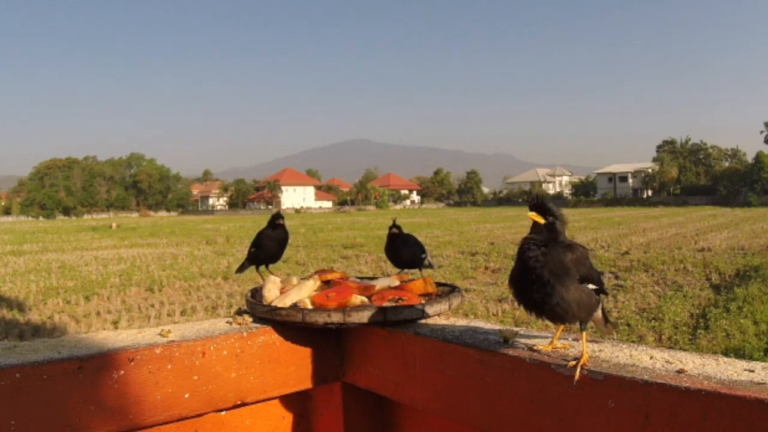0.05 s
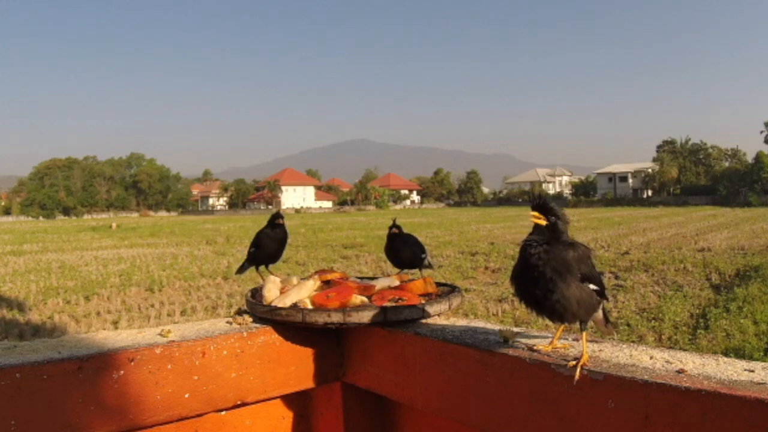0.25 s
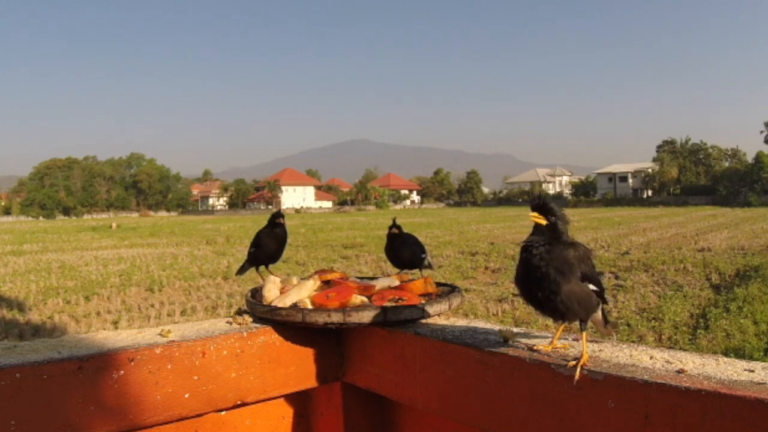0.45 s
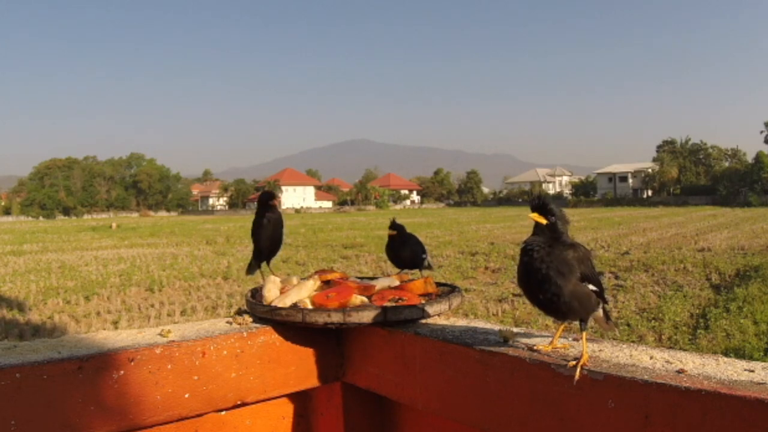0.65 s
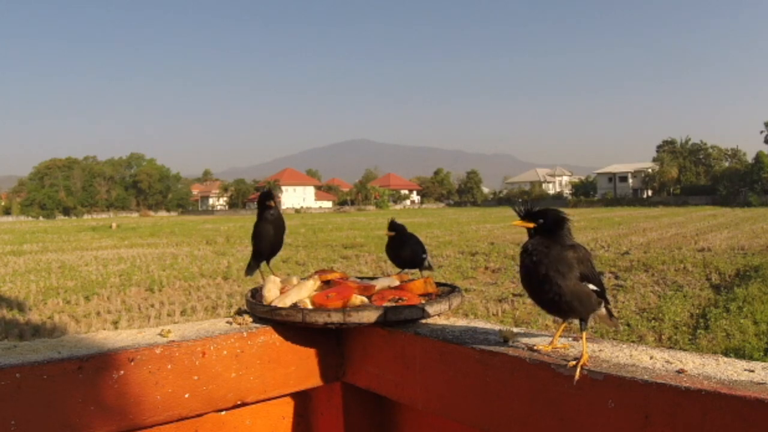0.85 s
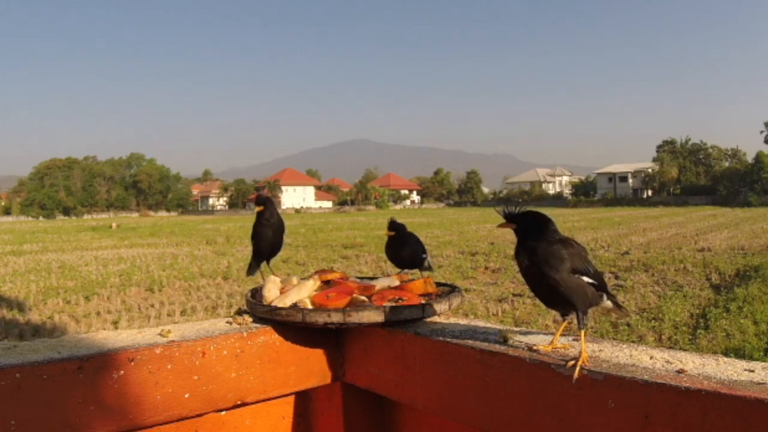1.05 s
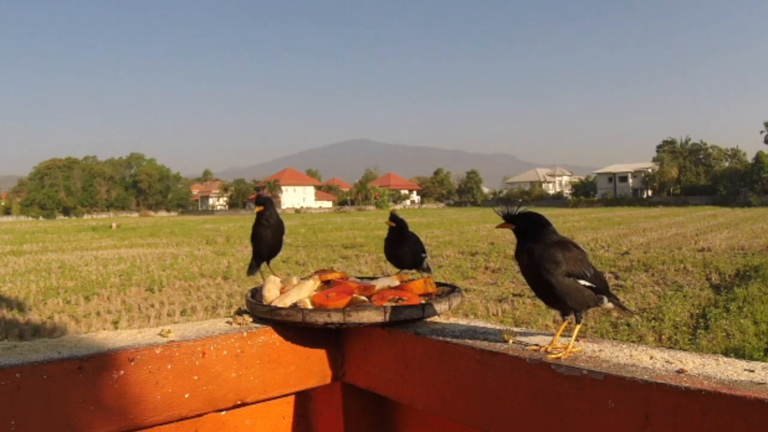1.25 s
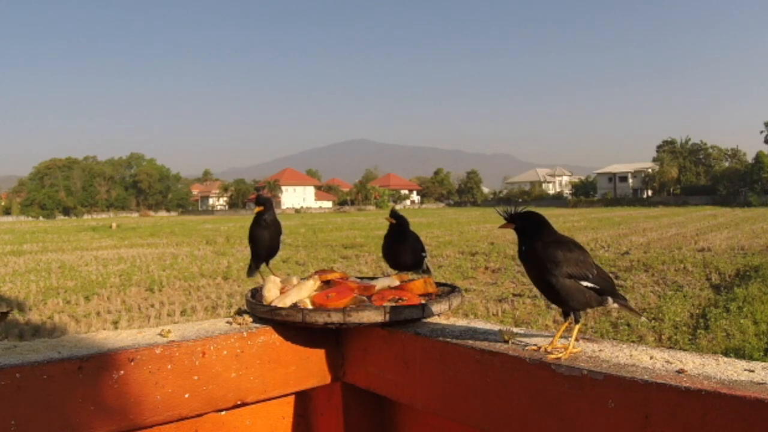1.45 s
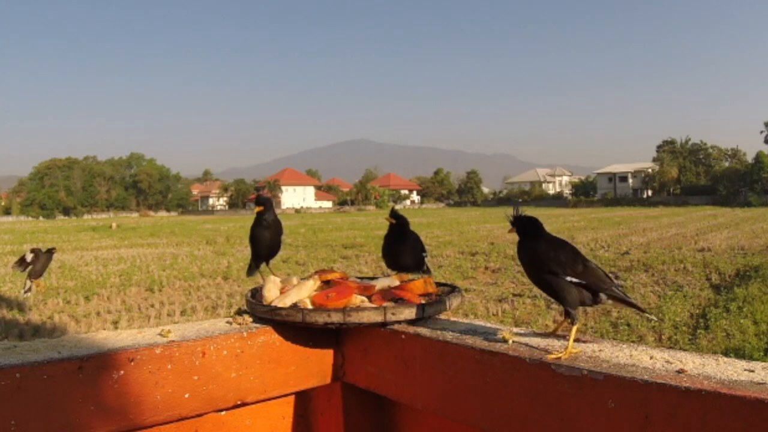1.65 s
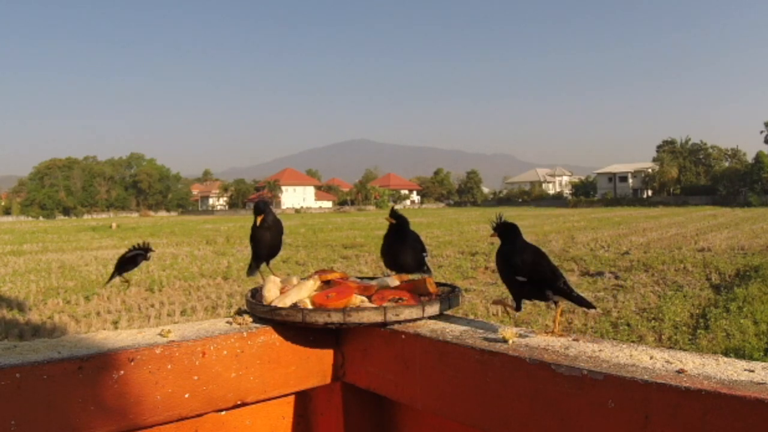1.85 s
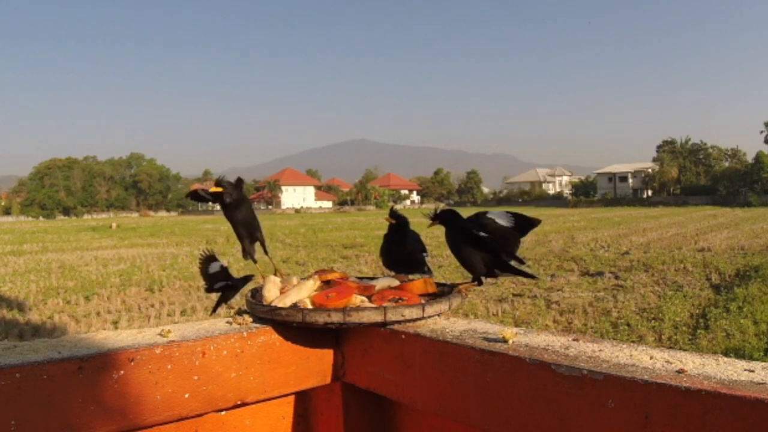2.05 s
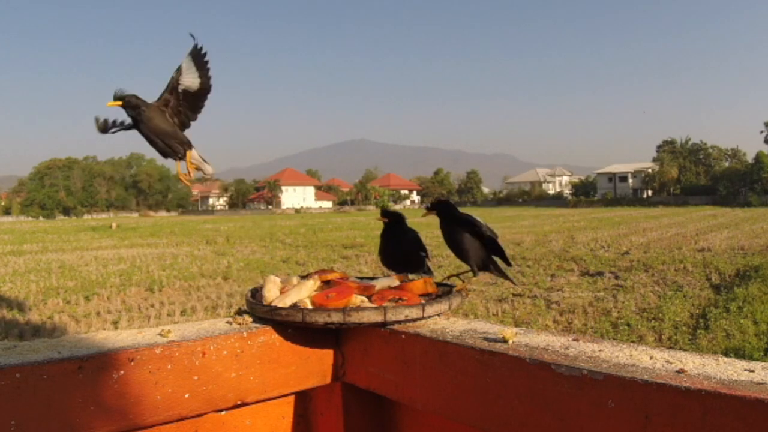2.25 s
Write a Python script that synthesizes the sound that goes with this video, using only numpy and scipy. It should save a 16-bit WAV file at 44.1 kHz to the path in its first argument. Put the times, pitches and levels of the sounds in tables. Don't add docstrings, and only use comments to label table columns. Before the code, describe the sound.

A myna calls once, loud and close: a short clean whistle rises from 0.2 seconds, then seven fast, deep pitch swoops form a harsh, buzzy trill from about 0.26, stopping abruptly near 0.53 with a short balcony echo. Throughout, a high cricket pulses about fifteen times a second over soft traffic hum, with faint katydid rasps. A tiny peep sounds at 1.6, fainter ones near 1.9-2.0, and very soft wing flutter after 1.5.

```python
import sys
import numpy as np
from scipy import signal
from scipy.fft import rfft, irfft
from scipy.io import wavfile
from scipy.ndimage import uniform_filter1d

SR = 44100
rng = np.random.default_rng(int(sys.argv[2]) if len(sys.argv) > 2 else 0)


def magnitude_from_level(level_db):
    exponent = np.asarray(level_db, float) / 20
    return 10 ** exponent


def inscribe(sig):
    pcm = np.round(np.clip(np.atleast_2d(sig).T, -1, 1) * 32767)
    wavfile.write(sys.argv[1], SR, pcm.astype(np.int16))


N = 101429

END_S, RELEASE_S = 0.5275, 0.0015


def curve(table, t, col):
    points = np.array(table, float)
    return np.interp(t, points[:, 0], points[:, col])


def log_curve(table, f):
    hz, db = np.array(table, float).T
    return np.interp(np.log(f), np.log(hz), db)


def walk(rate):
    k = max(int(SR / rate), 1)
    w = uniform_filter1d(uniform_filter1d(rng.standard_normal(N), k), k)
    return w / w.std()


def band(gain):
    return irfft(rfft(rng.standard_normal(N)) * gain, N)


def causal(gain_db):
    cepstrum = irfft(gain_db * np.log(10) / 20)
    half = len(cepstrum) // 2
    cepstrum[1:half] *= 2
    cepstrum[half + 1:] = 0
    return irfft(np.exp(rfft(cepstrum)))[:half]


def field(t, f):
    # [f/Hz, level/dB]
    spectrum = [(22, -36), (60, -12.5), (195, 1), (900, -9.5), (2600, -15.5), (6700, -26), (12500, -39),
                (15500, -39)]
    # [t/s, level/dB]
    hum = [(0, -53), (.2, -51), (.4, -44.5), (.55, -47), (.66, -45.5), (.85, -48.5), (1.15, -51),
           (1.65, -51.5), (1.9, -49.5), (2.3, -49.5)]
    treble_share, flicker_db = 0.86, 0.83
    shape = magnitude_from_level(log_curve(spectrum, f))
    swell = curve(hum, t, 1)
    mean = swell.mean()
    out = 0
    for k in range(10):
        part = band(shape * np.cos(np.pi / 2 * np.clip(np.log2(f / 30) - k, -1, 1)))
        share = 1 if k < 5 else treble_share
        out = out + part * magnitude_from_level(share * (swell - mean) + flicker_db * walk(4.6))
    return out / out.std() * magnitude_from_level(mean + 2)


def wings(t, f):
    # [start/s, end/s, beats per second/Hz, level/dB, centre f/Hz]
    flight = (1.5, 5, 15.5, -63.5, 2799.5)
    start, end, rate, db, hz = flight
    air = band(np.exp(-.5 * (np.log2(f / hz) / 0.74) ** 2))
    beat = .5 + np.sin(np.pi * rate * t) ** 2
    passing = np.sin(np.pi * np.clip((t - start) / (end - start), 0, 1))
    return air / air.std() * beat * magnitude_from_level(db) * passing


def katydid(t, f):
    # [start/s, length/s, level/dB]
    rasps = [(.19, 0.033, -64), (0.233, 0.14, -63.5), (.42, .03, -63), (.56, 0.04, -71), (0.732, 0.1, -66),
             (0.878, 0.036, -66), (1.02, 0.035, -67), (1.248, .11, -75), (1.372, 0.039, -72.5),
             (1.431, 0.026, -73), (1.55, 0.042, -74), (1.778, 0.081, -69), (1.89, .05, -68),
             (2.021, .04, -69.5), (2.136, 0.048, -72)]
    rasp_hz, width_hz, teeth_hz, rest_db = 13730, 500, 150, -88.5
    teeth = .25 + np.sin(np.pi * np.cumsum(teeth_hz * (1 + .3 * walk(30))) / SR) ** 2
    buzz = 0
    for shift_hz in (-300, 450):
        part = band(np.exp(-.5 * ((f - rasp_hz - shift_hz) / (width_hz / 2)) ** 2))
        buzz = buzz + part / part.std() * magnitude_from_level(3.5 * walk(40))
    gate = magnitude_from_level(rest_db + 3.6 * walk(12))
    for start, length, db in rasps:
        gate = gate + magnitude_from_level(db) * np.clip(np.minimum(t - start, start + length - t) / .015, 0, 1)
    return buzz * teeth * gate * .7


def peeps(t):
    # [centre/s, length/s, start f/Hz, end f/Hz, level/dB]
    far_peeps = [(.034, 0.0086, 3160, 3200, -47.5), (0.118, 0.021, 3200, 3100, -58),
                 (0.186, .012, 3260, 3100, -55), (1.595, 0.0032, 3440, 3310, -33.5),
                 (1.6, 0.011, 3427, 3280, -49), (1.897, .022, 3850, 3860, -59),
                 (1.947, 0.045, 3540, 3830, -58.5), (1.971, .02, 3850, 3920, -50.5),
                 (1.989, 0.036, 3915, 3960, -54), (1.758, 0.037, 3640, 3530, -60.5),
                 (2.209, .03, 2420, 2605, -60)]
    out = 0
    for mid, length, hz0, hz1, db in far_peeps:
        u = (t - mid) / length
        cycles = length * ((hz0 + hz1) / 2 * u + (hz1 - hz0) / 2 * u ** 2)
        out = out + magnitude_from_level(db) * np.exp(-8 * u ** 2) * np.sin(2 * np.pi * cycles)
    return out


def cricket(t):
    # [t from its end/s, f/Hz, level/dB, extra octave level/dB]
    chirp = [
        (-.041, 7460, -34, 5.5),
        (-.035, 7500, -8.5, 1.5),
        (-.022, 7465, -0.5, 1.5),
        (-.0185, 7465, -15.5, -2),
        (-.0155, 7520, -1.5, 0),
        (-.009, 7460, -3.5, -0.5),
        (-.004, 7430, 3, 0),
        (.001, 7390, -18, 5.5),
        (.014, 7400, -35, 3),
    ]
    # [t/s, level/dB]
    effort = [(0, -4), (.5, -1), (1.1, -3.5), (1.35, -1), (1.5, -0.5), (1.8, 2.5), (2.1, -0.5), (2.3, -1)]
    first_end_s, period_s = 0.0818, 0.06676
    level_db, octave_db, vary_db = -49.5, -7.5, 1.0
    lead = -chirp[0][0]
    u = (t - first_end_s + lead + 0.00079 * walk(7.2)) % period_s - lead
    hz = curve(chirp, u, 1) * (1 + 0.0025 * walk(5.1) + 0.0011 * walk(200))
    phase = 2 * np.pi * np.cumsum(hz) / SR
    silence = -30 * (u > chirp[-1][0])
    db = level_db + curve(effort, t, 1) + curve(chirp, u, 2) + silence
    tone = magnitude_from_level(vary_db * walk(25)) * np.sin(phase)
    octave = magnitude_from_level(octave_db + curve(chirp, u, 3) + vary_db * walk(60)) * np.sin(2 * phase)
    return np.sqrt(2) * magnitude_from_level(uniform_filter1d(db, 40)) * (tone + octave)


def balcony_echo():
    # [delay/s, level/dB, smear/s]
    echoes = [
        (.0032, -13, .0001),
        (.0065, -16, 0.00027),
        (.013, -21, .002),
        (.022, -23, 0.0057),
        (.045, -28, .008),
        (.072, -29, .004),
    ]
    u = np.arange(SR // 2) / SR
    room = 0
    for level_db, t60 in ((-16, 0.05), (-30, 0.25)):
        tail = rng.standard_normal(len(u)) * magnitude_from_level(-60 * u / t60) * np.clip(u / 0.0073, 0, 1)
        room = room + tail * magnitude_from_level(level_db) / np.sqrt(np.sum(tail ** 2))
    for lag, echo_db, smear in echoes:
        patch = rng.standard_normal(len(u)) * np.exp(-.5 * ((u - lag) / smear) ** 2)
        room = room + patch * magnitude_from_level(echo_db) / np.sqrt(np.sum(patch ** 2))
    room = signal.lfilter(*signal.butter(1, 1900, "high", fs=SR), room)
    room = room - .55 * signal.lfilter(*signal.iirpeak(3340, 9, fs=SR), room)
    room[0] += 1
    return room


def balcony(x):
    # [f/Hz, level/dB]
    colour = [(1200, -21), (1550, -5.5), (3400, 4.5), (3900, -5), (4150, -17.5), (6300, -15), (8300, -19.5),
              (9300, -50)]
    # [f/Hz, width/Hz, gain/dB]
    dips = [(1822, 55, -9), (2019, 48, -12), (2300, 70, -17), (3114, 46, -22.5), (4270, 170, -5.5),
            (4620, 180, 5), (5160, 140, -13.5), (5900, 140, -14.5), (6370, 250, 2.5), (7190, 297, -36)]
    f = np.linspace(1, SR / 2, 4097)
    low_cut = 18 * np.clip(np.log2(colour[0][0] / f), 0, 3)
    db = log_curve(colour, f) - low_cut
    for hz, width, gain in dips:
        db = db + gain / (1 + ((f - hz) / width) ** 2)
    coloured = signal.fftconvolve(x, causal(db))[:N]
    return signal.fftconvolve(coloured, balcony_echo())[:N]


def call_glide(t):
    # [t/s, f/Hz, level/dB]
    whistle = [(.204, 2882, -51), (.208, 2906, -26.5), (.2205, 2965, -23.5), (.222, 2985, -19.5),
               (.233, 3050, -17), (.2378, 3135, -19), (.2395, 3300, -15), (.246, 3400, -18.5),
               (.2540, 3537, -15.5), (.2565, 4200, -24)]
    # [fall start/s, top f/Hz, low f/Hz, rise start/s, level/dB]
    swoops = [
        (.2652, 4250, 1690, .288, -12.5),
        (.3039, 4130, 1552, .3272, -12.5),
        (.3425, 4147, 1560, .3682, -13.5),
        (.3838, 3940, 1573, .4087, -12),
        (.4238, 3940, 1661, .4518, -13.5),
        (.4666, 3950, 1564, .4915, -13),
        (.5047, 3422, 1587, .5245, -18),
    ]
    fall_s, rise_s, round_s, sag_hz = .014, 0.0055, 0.0025, 70
    crest_s, knee_s, knee_share = .0055, .0100, .12
    knots = list(whistle)
    for number, (fall, top, low, rise, db) in enumerate(swoops):
        start = min(top - 80, 3970)
        slow = 1.38 if number == 0 else 1
        knots += [(fall - crest_s, top, db),
                  (fall, start, db),
                  (fall + slow * knee_s, low + knee_share * (start - low), db),
                  (fall + slow * fall_s, low + sag_hz, db),
                  (rise - .003, low, db),
                  (rise, low + sag_hz / 2, db)]
        if number + 1 < len(swoops):
            knots.append((rise + rise_s, swoops[number + 1][1] - 70, db))
        else:
            knots.append((END_S + RELEASE_S, 1860, db))
    knots.sort()
    hz = uniform_filter1d(curve(knots, t, 1), int(round_s * SR))
    gate = (t > whistle[0][0]) * np.clip((END_S + RELEASE_S - t) / RELEASE_S, 0, 1)
    return hz, magnitude_from_level(curve(knots, t, 2)) * gate


def myna(t):
    # [multiple of pitch, level at low pitch/dB, change at top pitch/dB]
    partials = [(1, 0.5, 0.5), (2, 1.5, -8.5), (3, -8.5, -3), (4, -6, -9.5), (5, -14, -9.5), (6, -15, -9.5)]
    # [t/s, half lines/dB, octave at swoop bottom/dB, overtones and undertone at top/dB]
    quality = [(.245, -47, -3, -1.5), (.285, -23.5, -4, 0.5), (.325, -13, -16, 0), (.365, -10.5, -15, 0),
               (.405, -14, -15, -2.5), (.445, -5, -5, -0.5), (.485, -5.5, -10, 1), (.500, -6.5, -5, 8),
               (.525, -6.5, -4, 3)]
    half_top_db, half_tilt_db, undertone_db, rasp_db = -6.5, -0.5, -13, -17.5
    jitter, rise_jitter, shimmer_db, overtone_break = 0.0052, .045, 1.85, 1.1
    hz, loudness = call_glide(t)
    rough = np.clip((t - .255) / 0.033, .1, 1)
    high = np.clip((hz - 1600) / 2300, 0, 1)
    rising = np.clip(np.gradient(hz) * SR / 385000.0, 0, 1)
    wobble = (jitter + rise_jitter * rising) * rough * walk(694)
    phase = 2 * np.pi * np.cumsum(hz * (1 + wobble)) / SR
    voice = magnitude_from_level(rasp_db) * rough * walk(9000) * (1 + np.sin(phase))

    pure_db = -6 * np.clip((.262 - t) / 0.00915, 0, 1)
    bright = pure_db + 4 * rising * (1 - 2 * high)
    octave = curve(quality, t, 2) * np.clip((1800 - hz) / 150, 0, 1)
    half_db = curve(quality, t, 1)
    crest = curve(quality, t, 3) * high
    voice = voice + magnitude_from_level(half_db + undertone_db + crest) * high * np.sin(phase / 2)
    ending = np.clip((t - .5) / .012, 0, 1)
    for k, db, top_db in partials:
        shimmer = shimmer_db * (1 + overtone_break * (k > 2)) * rough * walk(500)
        shimmer = shimmer - 9 * ending * np.clip(k * hz / 1500 - 4, 0, 1)
        level = db + top_db * high + shimmer
        level = level + (k > 1) * (bright + crest) + (k == 2) * octave
        voice = voice + (k * hz < 16000) * magnitude_from_level(level) * np.sin(k * phase)
        half = half_db + half_top_db * high + half_tilt_db * k + shimmer + crest
        voice = voice + (k * hz < 14000) * magnitude_from_level(half) * np.sin((k + .5) * phase)
    return voice * loudness * np.sqrt(2)


def scene():
    t = np.arange(N) / SR
    f = np.arange(N // 2 + 1) * SR / N + 1
    background = field(t, f) + wings(t, f) + katydid(t, f) + peeps(t) + cricket(t)
    return (background + balcony(myna(t)))[None]


def band_limit(x):
    return signal.sosfilt(signal.butter(12, 16130, fs=SR, output="sos"), x)


def record(dry):
    low_pass = signal.ellip(8, .2, 60, 15250, fs=SR, output="sos")
    mix = signal.sosfilt(low_pass, dry)
    return band_limit(mix)


dry = scene()
out = record(dry)
inscribe(out)
```